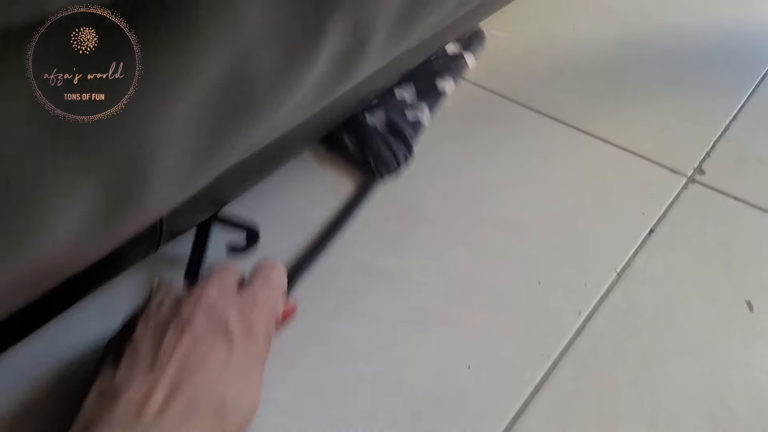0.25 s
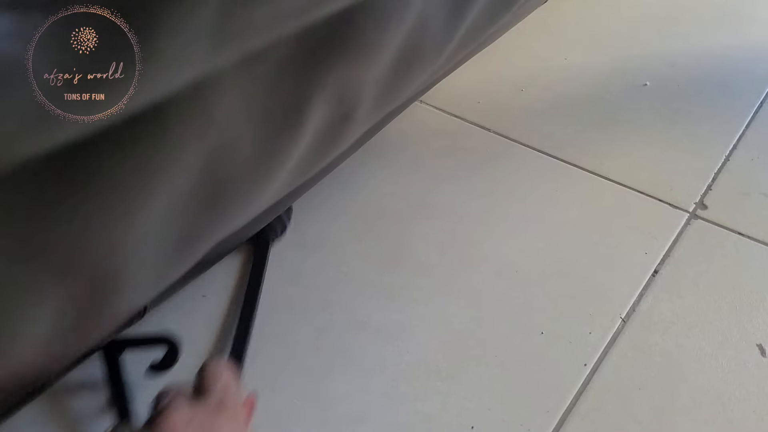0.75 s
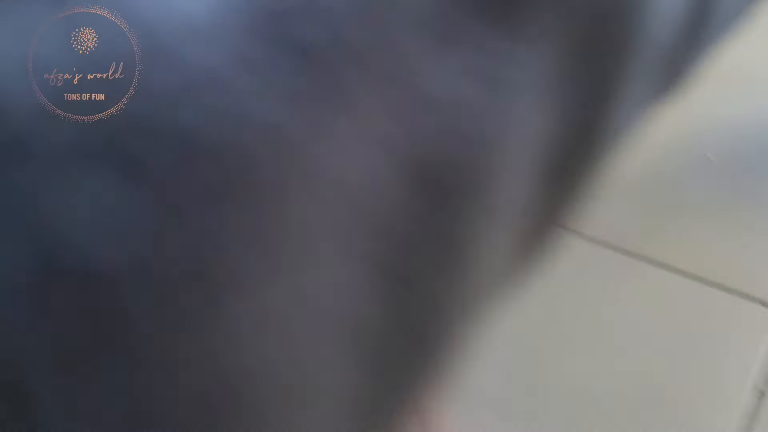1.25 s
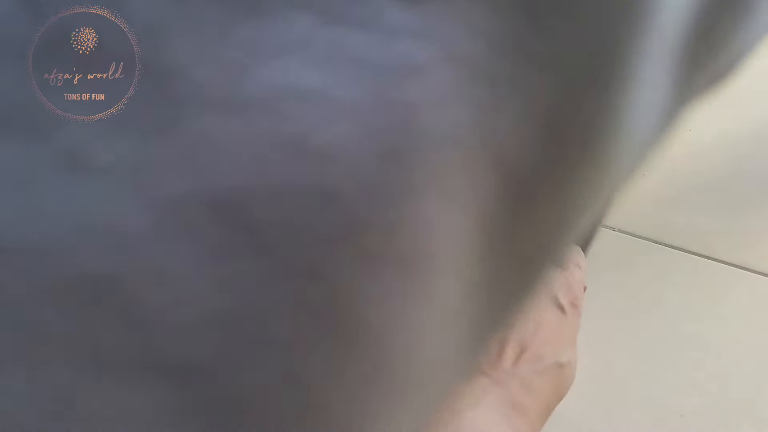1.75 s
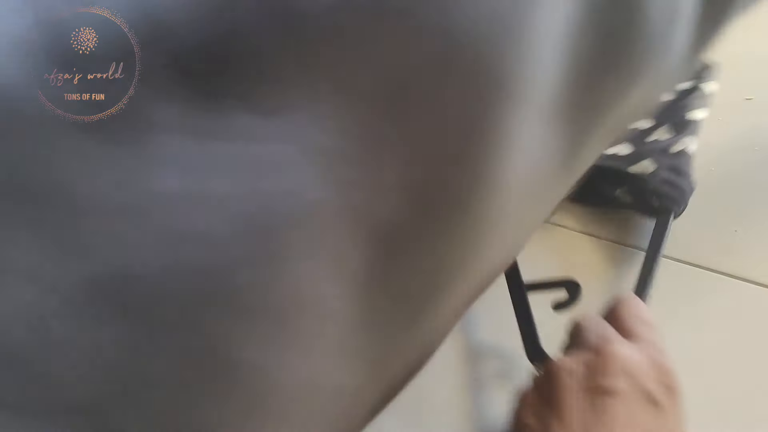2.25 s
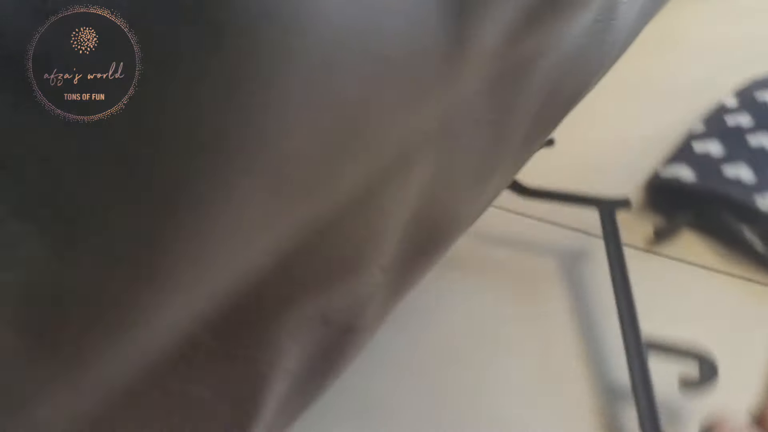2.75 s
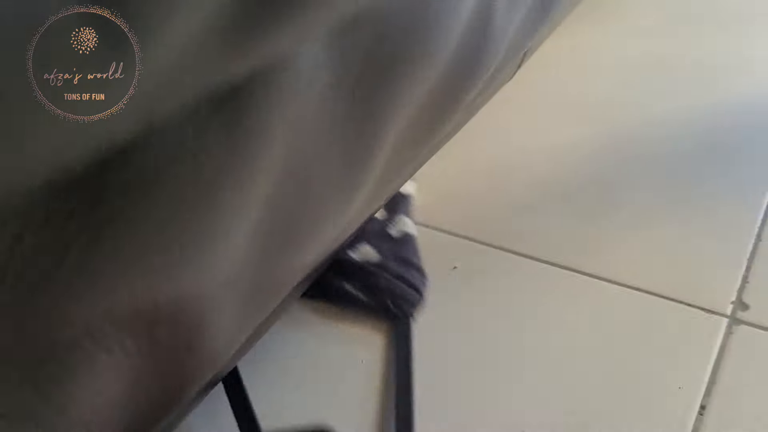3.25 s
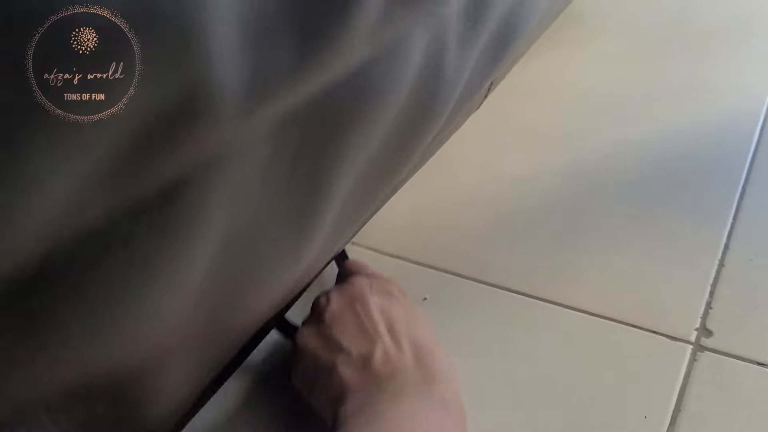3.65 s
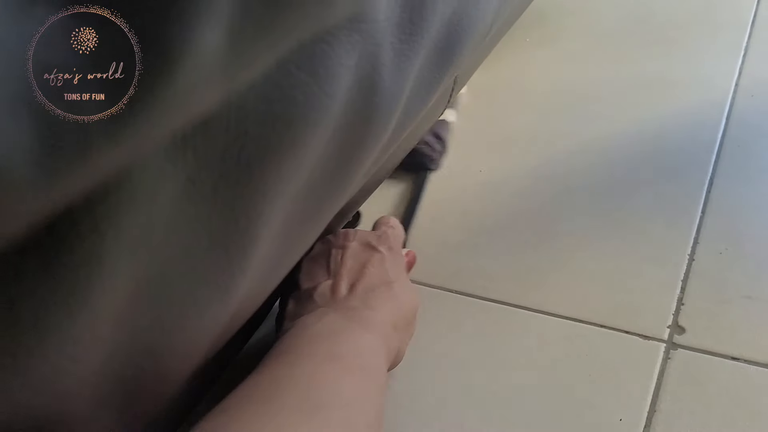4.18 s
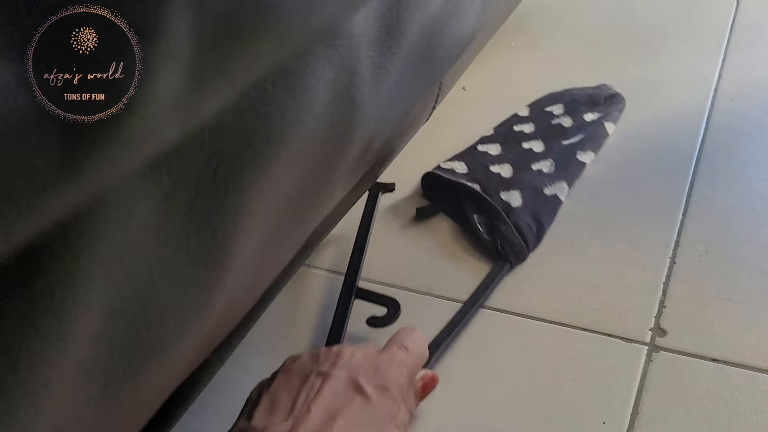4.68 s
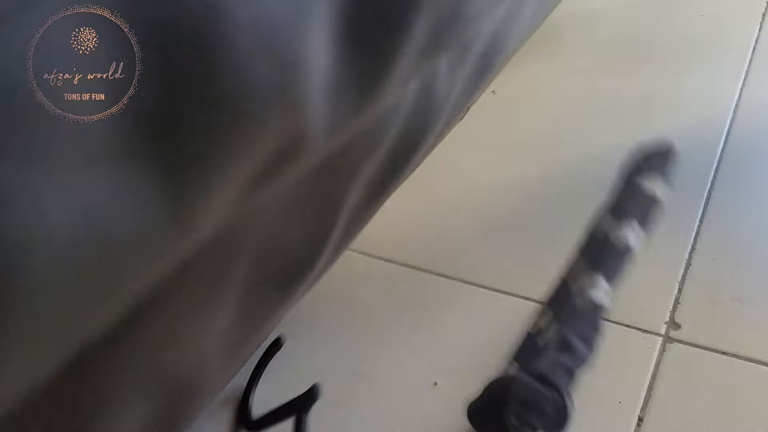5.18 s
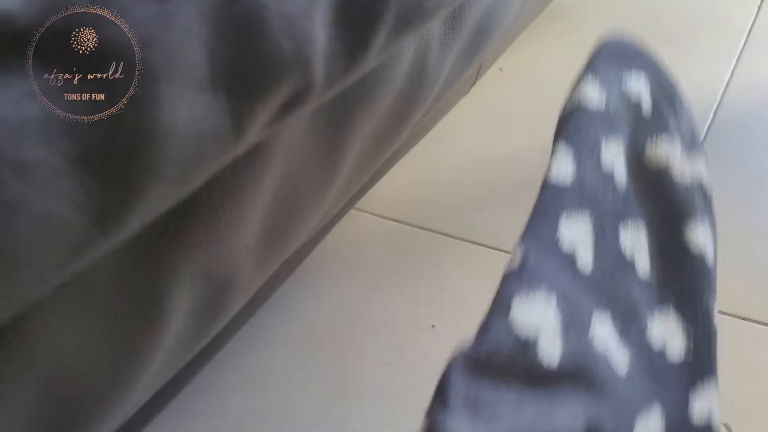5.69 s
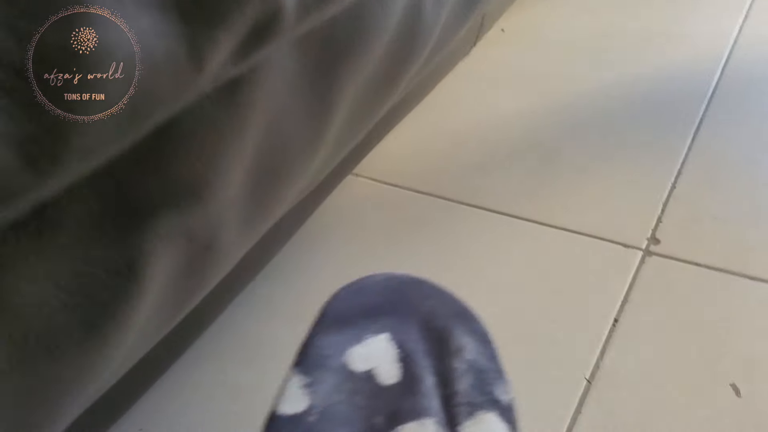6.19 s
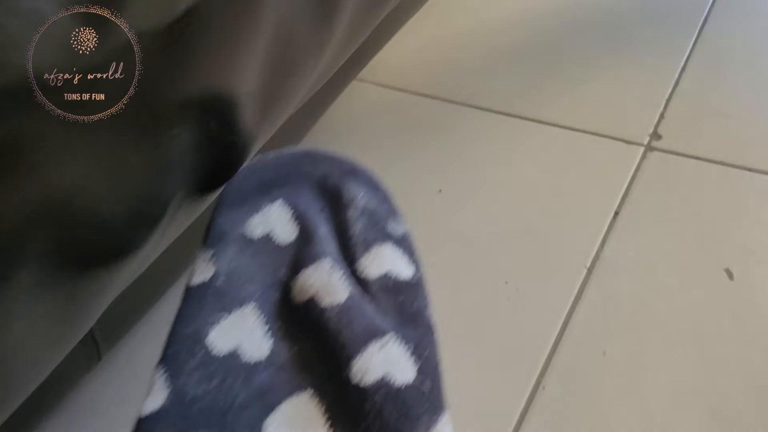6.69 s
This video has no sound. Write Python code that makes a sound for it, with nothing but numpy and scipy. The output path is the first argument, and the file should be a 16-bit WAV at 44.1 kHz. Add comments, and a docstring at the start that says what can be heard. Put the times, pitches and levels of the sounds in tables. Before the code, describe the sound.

Hollow plastic scuffs, short squeaky drags and bright clacks on tile, soft cloth hiss and dull microphone thumps over a steady low hum.

```python
"""A plastic hanger with a sock on its end is pushed about on floor tiles under a sofa, close to a hand-held phone.
The sock hisses as shaped noise; the bare plastic scrapes as noise and kicks through resonances.
It also sings in gliding narrow bands, and clacks as decaying tones with a rattle and a tiled echo.
The phone bumps the sofa at its left microphone and the grip rubs at its right one: low swings and lumps.
Behind them a fan hums in steady multiples of its blade rate, over the room's rumble, hum and faint noise."""
import sys
import numpy as np
from scipy import signal
from scipy.fft import rfft, irfft, next_fast_len
from scipy.io import wavfile
from scipy.ndimage import uniform_filter1d, map_coordinates

SR = 44100
rng = np.random.default_rng(int(sys.argv[2]) if len(sys.argv) > 2 else 0)


def generate_wav(signal):
    """Clip the signal to [-1, 1] and save it as 16-bit WAV at the path in sys.argv[1]."""
    frames = np.transpose(np.atleast_2d(signal))
    scaled = np.clip(frames, -1, 1) * 32767
    pcm = np.round(scaled).astype(np.int16)
    wavfile.write(sys.argv[1], SR, pcm)


N = 305657  # length in samples


def amp(db):
    """Gain of a level in dB."""
    return 10 ** (np.asarray(db) / 20)


def unit(x):
    """Scale x to an rms of 1."""
    return x / np.sqrt(np.mean(x ** 2) + 1e-20)


def along(points, hz):
    """Read a curve of (Hz, value) points on a log frequency axis."""
    f, value = np.transpose(points)
    return np.interp(np.log(hz + 1), np.log(f + 1), value)


def curves(rows):
    """Give one value per sample for each column after the time."""
    s, *columns = np.transpose(rows)
    return [np.interp(np.arange(N) / SR, s, column) for column in columns]


def wobble(rate, size=N):
    """Draw a smooth random curve through `rate` random points a second."""
    knots = rng.standard_normal(int(size * rate / SR) + 4)
    return map_coordinates(knots, [np.arange(size) * rate / SR])


def filtered(x, response):
    """Multiply the spectrum of x by a response, which is a function of frequency."""
    m = next_fast_len(x.shape[-1] + 8192)
    spectrum = rfft(x, m) * response(np.fft.rfftfreq(m, 1 / SR))
    return irfft(spectrum, m)[..., :x.shape[-1]]


def colour(points):
    """Make a filter response from (Hz, dB) points."""
    return lambda hz: amp(along(points, hz))


def resonant(peaks):
    """Make the response of (Hz, width Hz, dB) resonances, added with alternating sign."""
    def response(f):
        total = 0
        for k, (centre, width, db) in enumerate(peaks):
            damping = 1j * f * width
            total = total + (-1) ** k * amp(db) * damping / (centre ** 2 - f ** 2 + damping)
        return total
    return response


def pair(alike, grit_db):
    """Stereo noise with a shared part; grit makes its level waver in fine grains."""
    shared, left, right = rng.standard_normal((3, N))
    noise = np.sqrt(alike) * shared + np.sqrt(1 - alike) * np.array([left, right])
    return noise * amp(grit_db * wobble(160))


def sides(db):
    """Gains of both channels for a left-right level step."""
    return amp(np.array([db / 2, -db / 2]))


def patchy(x, depth_db):
    """Random patches of gain over time and frequency, shared by both channels."""
    z = signal.stft(x, nperseg=512)[2]
    field = rng.standard_normal(z.shape[1:])
    field = uniform_filter1d(field, size=3, axis=0)  # blur over frequency
    field = uniform_filter1d(field, size=8, axis=1)  # blur over time
    return signal.istft(z * amp(depth_db * unit(field)), nperseg=512)[1][:, :N]


def grit(rate, spread_db, alike):
    """Sparse random kicks of very unequal size, heard partly alike at both ports."""
    struck = rng.random((3, N)) < rate / SR
    size = amp(spread_db * np.minimum(rng.exponential(size=(3, N)), 3.5))
    kicks = struck * size * np.sign(rng.standard_normal((3, N)))
    return unit(np.sqrt(alike) * kicks[0] + np.sqrt(1 - alike) * kicks[1:])


def swells(peak_s, rise_s, fall_s, db):
    """Summed gain of events that swell to a peak and fade, evenly in dB: 12 dB per rise or fall time."""
    late = np.arange(0, N + 32, 32)[None] / SR - np.c_[peak_s]  # one value per 32 samples
    fall_s = np.maximum(fall_s, .015)  # no fade is quicker than this
    away = np.where(late < 0, -late / np.c_[rise_s], late / np.c_[fall_s])
    power = np.sum(amp(np.c_[db] - 12 * away) ** 2, axis=0)
    return np.repeat(np.sqrt(power), 32)[:N]


def skids(column):
    """Gain that the hanger's landing and skidding out gives to one layer: a quick swell and a fade."""
    # the skids: t/s, cloth hiss level/dB, fine fluff level/dB, long arms level/dB, short parts level/dB,
    # time to fade 12 dB/s (swells raises the shortest)
    skid_rows = np.array([(1.244, -60, -49.5, -39.5, -43.5, 0.1), (1.352, -53, -51.5, -41.5, -44, 0.24),
                          (1.658, -52, -55.5, -42, -37.5, 0.07), (1.944, -58, -61, -46, -48, 0),
                          (2.109, -44, -62, -43, -37.5, 0.0652), (2.562, -65, -52, -44.5, -50.5, 0.08),
                          (3.19, -54, -47.5, -58, -46, 0.07), (3.918, -61, -59, -47, -47, 0.06),
                          (4.208, -40.5, -40, -38.5, -44, 0.03), (4.251, -32.5, -39, -38, -34, -0.04),
                          (4.273, -36, -39.5, -37, -36, -0.0629), (5.091, -31.5, -33.5, -36.5, -25, 0.1),
                          (5.692, -49, -61, -41.5, -33, 0.07)])
    attack_s = np.full(len(skid_rows), 0.0021)  # time to swell 12 dB
    return swells(skid_rows[:, 0], attack_s, skid_rows[:, -1], skid_rows[:, column])


def cloth():
    """The knitted sock brushes tile and upholstery: a soft hiss of two noise bands."""
    # the sock sweeping: t/s, cloth hiss level/dB, fine fluff level/dB, left-right step/dB
    sweeps = [(0.0, -62, -67, -1), (0.08, -66.5, -70, -1.5), (0.17, -54.5, -61, 0), (0.28, -53, -57.5, 0.4),
              (0.5, -57, -56, 0.5), (0.89, -63, -65, -2), (1.07, -50.5, -52, -3), (1.22, -63, -60, 0),
              (1.505, -53, -53, 0.3), (1.59, -59.5, -59, 1), (1.75, -55.5, -53.5, 0),
              (1.85, -67, -65, -0.5), (1.99, -58.5, -59, 1.5), (2.1, -73, -67, -1.5),
              (2.22, -59, -59, -1.5), (2.33, -68.5, -70, -3), (2.47, -61.5, -63, 0.5),
              (2.75, -50, -48.5, 3), (3.05, -53, -52.5, 0), (3.12, -63, -60, 3), (3.72, -56, -56, -5.5),
              (3.9, -59, -52.5, 1.5), (4.09, -61, -57.5, 1), (4.19, -55, -55, -3), (4.32, -52.5, -50.5, -1),
              (4.64, -51.5, -53, 0.5), (4.93, -51.5, -54, -0.9), (5.08, -65, -54, -1),
              (5.41, -50.5, -49.5, -1), (5.51, -62.5, -58, -3), (5.685, -64, -63.5, -6),
              (5.85, -58.5, -57, -1.5), (5.99, -60, -59, 0.3), (6.1, -69, -67.5, -1), (6.19, -81, -78, -2),
              (6.35, -78, -75, -3), (6.5, -66.5, -66, -3.5), (6.93, -71, -61, -6.5)]
    # spectrum of the cloth hiss: f/Hz, level per Hz/dB
    weave_spectrum = [(1760, -39), (3000, -19), (3380, -40), (3620, -7.5), (4720, 1), (6460, 1.5),
                      (9500, 1), (12400, -6.5), (20900, -120)]
    # spectrum of the fine fluff: f/Hz, level per Hz/dB
    fluff_spectrum = [(5000, -18.5), (8500, -7), (11000, 0.5), (15100, -6.5), (15900, -5.5), (16200, -24.5)]
    weave_db, fluff_db, pan_db = curves(sweeps)
    weave = unit(filtered(patchy(pair(0.025, grit_db=1.05), depth_db=2.0), colour(weave_spectrum)))
    fluff = unit(filtered(patchy(pair(.05, grit_db=1.1), depth_db=0.5), colour(fluff_spectrum)))
    # sweeps and skids add as powers
    weave_gain = np.hypot(amp(weave_db), skids(column=1))
    fluff_gain = np.hypot(amp(fluff_db), skids(column=2))
    return amp(0.76 * wobble(22)) * (weave_gain * weave + fluff_gain * fluff) * sides(pan_db)


def scrape():
    """Grit under the sliding plastic kicks the resonances of the frame, on top of a fine rub."""
    # bare plastic scuffs the tile: loudest t/s, time to swell 12 dB/s, time to fade 12 dB/s (both have
    # a shortest value), long arms level/dB, short parts level/dB (both trimmed below)
    scuffs = [(0.06, -2, 0.3, -56.5, -64), (0.28, 0.2, 0.05, -56, -54), (0.45, 0.1, 0.1, -47, -51.5),
              (0.73, 1.2, -0.2, -60.5, -63), (1.085, 0.12, 0.2, -49, -44.5),
              (1.425, 0.13, 0.22, -50, -43.5), (1.735, 0, 0.27, -51, -60), (2.22, 0.06, 0.12, -49.5, -50),
              (2.4, 2, -2, -63, -84), (2.752, 0.16, 0.05, -46, -55), (2.88, 0.2, 0.27, -53, -53.5),
              (2.968, 0.09, -0.12, -41.5, -43), (3.052, 0.08, 0.07, -42.5, -48.5),
              (3.15, 0.06, 0.09, -42.5, -55), (3.235, -0.3, 0.15, -51, -64), (3.7, 0.37, 0.2, -72, -52),
              (3.86, 0.35, 0.5, -52, -60), (4.045, 0.08, 0.17, -46.5, -58), (4.29, 0.11, 0.03, -47, -39.5),
              (4.34, 0.06, 0.01, -48, -42.5), (4.65, 0.5, 0.1, -49.5, -54.5), (4.86, 0.1, -0.1, -63, -49),
              (5.019, 0.08, 0.04, -37, -49.5), (5.32, 0.15, 0.04, -55, -38.5),
              (5.431, 0.0337, 0.0427, -37, -32.5), (5.55, 0.5, 0.12, -56.5, -52),
              (5.9, 0.13, -0.01, -59, -47.5), (6.01, 0, -0.01, -52.5, -45), (6.45, 0.3, 1.5, -64.5, -65),
              (6.8, 1, 7, -70.5, -70)]
    # resonances of the long arms: f/Hz, width/Hz, level/dB
    arm_peaks = [(452, 82, 7), (685, 163, 5.5), (791, 159, 5), (982, 92, 0.5), (1240, 250, -5)]
    # resonances of the short parts: f/Hz, width/Hz, level/dB
    part_peaks = [(1515, 230, 3.5), (1960, 295, 5), (2250, 247, 3), (2800, 580, -1), (3540, 850, -3.5),
                  (4650, 1000, -6.5)]
    rest_db = -76  # the plastic barely touches between scuffs; before the trims

    def steep(peaks):
        """The resonances with less bass below the first and less treble above the last."""
        def response(hz):
            bass_cut = hz ** 2 / (hz ** 2 + peaks[0][0] ** 2)
            return resonant(peaks)(hz) * bass_cut / (1 + (hz / peaks[-1][0] / 2.2) ** 4)
        return response

    peak_s, rise_s, fall_s, arms_db, parts_db = np.transpose(scuffs)
    rise_s = np.maximum(rise_s, .02)  # a scuff never starts abruptly
    arms_gain = np.hypot(swells(peak_s, rise_s, fall_s, arms_db), skids(column=3)) + amp(rest_db)
    parts_gain = np.hypot(swells(peak_s, rise_s, fall_s, parts_db), skids(column=4)) + amp(rest_db)
    kicks = patchy(0.73 * grit(500, spread_db=3.5, alike=0.48), depth_db=3.5)
    arms_rub = patchy(pair(0.38, grit_db=0.0), depth_db=3.5)
    parts_rub = patchy(pair(0.061, grit_db=1.5), depth_db=2.5)
    arms = unit(filtered(arms_rub + kicks, steep(arm_peaks)))
    parts = unit(filtered(parts_rub + kicks, steep(part_peaks)))
    slip = wobble(25)  # the stroke catches and lets go
    arms_gain = arms_gain * amp(-4.0 + 0.4 * slip)
    parts_gain = parts_gain * amp(-6.5 + 1.3 * slip)
    return (arms_gain * arms + parts_gain * parts) * sides(np.array([-3.]))


def drags():
    """Slips of the plastic ring a narrow band that glides: kicks and slow noise carried on a moving pitch."""
    # one part of the frame sings while it drags: start t/s, end t/s, first f/Hz, last f/Hz, width/Hz,
    # level/dB (before the swell and fade), left-right step/dB
    glides = [(0.39, 0.503, 590, 674, 150, -49, -1), (0.4, 0.52, 1400, 1470, 200, -53.5, -2),
              (1.646, 1.678, 1820, 2300, 630, -40, -6), (1.635, 1.675, 4400, 4000, 900, -47.5, -4),
              (1.5, 1.6, 1780, 1850, 300, -58.5, -2), (1.68, 1.725, 1900, 1800, 400, -59, -5),
              (1.652, 1.675, 920, 650, 400, -42, 0), (2.19, 2.25, 4400, 4200, 900, -55.5, -3),
              (2.195, 2.232, 1926, 1600, 250, -43.5, -2.5), (2.689, 2.84, 1590, 1615, 250, -53.5, -2),
              (2.656, 2.826, 2250, 2100, 290, -57.5, -9), (1.374, 1.516, 705, 680, 460, -47.5, 12),
              (1.36, 1.46, 1900, 1700, 900, -50.5, 3), (1.38, 1.44, 4200, 2900, 1500, -54, 7),
              (3.02, 3.18, 1350, 1200, 440, -53, -3), (3.2, 3.26, 2300, 2200, 700, -54.5, -6),
              (2.69, 2.82, 670, 780, 300, -53, -3), (2.872, 2.984, 1580, 1620, 190, -57, -5),
              (3.083, 3.178, 2240, 2270, 180, -55, -12), (3.223, 3.237, 1400, 1570, 200, -47, -12),
              (4.05, 4.21, 2550, 2450, 360, -61.5, -5), (4.205, 4.25, 1700, 2300, 900, -48, -2.5),
              (4.255, 4.3, 1600, 1900, 600, -45, -2), (4.34, 4.41, 1900, 1600, 1400, -51.5, 0),
              (5.78, 6.06, 3000, 3300, 1300, -55, -6), (5.7, 5.74, 1850, 1800, 300, -50, -5),
              (5.8, 5.87, 1400, 1400, 400, -57, -5), (4.27, 4.36, 3400, 3700, 900, -49.5, 0),
              (2.915, 2.985, 3600, 4000, 1500, -56, -3), (5.7, 5.8, 2700, 2700, 700, -54.5, -3),
              (5.33, 5.49, 1900, 1800, 500, -56, 1), (4.322, 4.361, 1000, 984, 210, -41.5, -1),
              (4.84, 5.04, 580, 770, 380, -48.5, -3), (5.12, 5.26, 1300, 1600, 120, -46, -7),
              (5.125, 5.25, 4500, 3800, 250, -52, -3), (5.125, 5.2, 5400, 6200, 300, -50, -3),
              (5.13, 5.3, 1880, 1700, 150, -48, 6), (5.2, 5.3, 1480, 1300, 150, -47.5, 4),
              (5.3, 5.37, 1750, 1800, 200, -49.5, 3), (5.28, 5.46, 1230, 1170, 130, -42, 9),
              (5.27, 5.44, 2540, 2620, 240, -43, -5), (5.32, 5.508, 920, 750, 590, -45.5, 0),
              (5.3, 5.36, 5200, 4200, 700, -50.5, -0.5), (5.38, 5.47, 3900, 3500, 1200, -52, -2),
              (5.37, 5.49, 2780, 2950, 180, -46, -9), (5.36, 5.485, 4520, 4480, 250, -48, 3),
              (5.76, 5.96, 2850, 2700, 600, -56, -10), (5.95, 6.17, 3200, 3000, 500, -57.5, -6),
              (5.81, 6.05, 2100, 2500, 960, -55, -10), (5.86, 6.05, 4290, 4300, 280, -58, -1),
              (5.89, 6.12, 5100, 4800, 300, -61.5, -4), (5.96, 6.04, 2550, 2550, 255, -56, -7),
              (5.99, 6.19, 2050, 1800, 350, -62.5, -9)]
    wander = .012  # a drag strays from its glide by this share of the pitch
    slips_per_s, slip_share = 1100, 0.6  # stick-slip kicks, their share against the even rub
    lean, edge = 0.72, 0.83  # a drag swells faster than it fades; softness of its ends
    sing = 0.55  # steady tone in the narrowest drags, against their noise
    out = np.zeros((2, N))
    for start, end, first_hz, last_hz, width_hz, db, pan_db in glides:
        n = round((end - start) * SR)
        rub = unit(rng.standard_normal((2, 2, SR // 2)))  # (cosine or sine part, channel, time)
        slips = (rng.random(SR // 2) < slips_per_s / SR) * rng.exponential(size=SR // 2)
        slips = unit(slips) * rng.normal(0, 1, (2, 2, SR // 2))
        lowpass = lambda hz: (1 + 2j * hz / width_hz) ** -1.4
        slow = unit(filtered(rub + slip_share * slips, lowpass)[..., -n:])
        pitch_hz = np.linspace(first_hz, last_hz, n) * (1 + wander * wobble(30, size=n))
        turn = 2 * np.pi * np.cumsum(pitch_hz) / SR
        judder = amp(1.3 * wobble(120, size=n) + 1.0 * wobble(35, size=n))  # the drag is uneven
        tone = sing * (width_hz < 260)
        band = unit(judder * ((slow[0] + tone) * np.cos(turn) + slow[1] * np.sin(turn)))
        shape = np.abs(np.sin(np.pi * np.linspace(0, 1, n) ** lean)) ** edge
        out[:, round(start * SR):][:, :n] += amp(db) * band * shape * sides(np.array([pan_db]))
    return out


def clacks():
    """Each knock rings the modes near the struck spot and rattles; the tiled room answers each in its own way."""
    # clacks: t/s, knock level/dB, where it rings most f/Hz, rattle level/dB, time for the rattle to
    # fall 60 dB/s, left-right step/dB (knock and rattle levels are trimmed below)
    knocks = [(0.733, -62, 4000, -37, 0.018, 10), (1.105, -32, 1800, -44, .02, -18),
              (1.128, -35, 1800, -52, .02, -21), (1.517, -32, 1700, -52, .01, -3),
              (1.6585, -22, 2120, -39, .02, -3), (1.662, -29, 2200, -45, .015, -3),
              (1.665, -32, 4300, -55, 0.022, -8), (1.665, -26.5, 1000, -50, .01, -3),
              (1.669, -29, 2400, -50, .01, -3), (1.9428, -28, 1100, -36, 0.007, 14),
              (2.083, -39, 1500, -64, .01, -7), (2.1067, -24.5, 1690, -21, 0.024, -6),
              (2.1075, -27, 4900, -40, .02, -6), (2.156, -34, 1600, -55, .01, -4),
              (2.178, -32, 1700, -55, .01, -4), (2.2006, -35, 1900, -50, .01, -4),
              (2.5335, -40, 2300, -48, .01, -5), (2.689, -30.5, 1300, -50, .01, -6),
              (2.7252, -38, 2300, -52, .01, -4), (2.7462, -29, 800, -52, .01, -4),
              (2.766, -34, 750, -55, .01, -2), (2.796, -31, 1600, -52, .01, -4),
              (2.8878, -44, 1600, -55.5, .01, -4), (2.9063, -33, 800, -52, .01, -5),
              (2.935, -40, 2300, -46, .015, -3), (2.949, -42, 1600, -46, .015, -3),
              (2.9622, -25, 750, -44, 0.026, -7), (2.971, -32.5, 1700, -48, .015, -5),
              (2.984, -36, 920, -58, .01, -3), (3.021, -30, 1000, -47, .01, -1),
              (3.053, -33, 800, -50, .01, 1), (3.066, -33, 720, -55, .01, 2),
              (3.085, -36, 750, -55, .01, 0), (3.1532, -33.5, 800, -49, .01, -2),
              (3.165, -42, 1300, -52, .01, -2), (3.1885, -16, 2060, -37, .015, -9),
              (3.212, -35, 2300, -50, .01, -6), (3.235, -39, 900, -52, .01, -6),
              (3.916, -24.5, 1630, -40, 0.013, -9), (4.0274, -30, 900, -54.5, .01, -7),
              (4.042, -35, 1200, -56, .01, -5), (4.061, -39, 900, -55, .01, -3),
              (4.201, -50, 4800, -33.5, .03, -1), (4.208, -29, 1490, -50, .01, -5),
              (4.214, -44, 4800, -25, 0.029, -5), (4.2505, -11.5, 1500, -34, .03, -5.5),
              (4.258, -22.5, 1900, -38, .02, -3), (4.2714, -20, 3200, -25, 0.035, 1),
              (4.2215, -37, 1200, -36, .015, -3), (4.238, -35, 1400, -50, .01, 6),
              (4.265, -35, 1600, -45.5, .015, -2.5), (4.279, -29, 1200, -39.5, .015, 0),
              (4.291, -34, 2200, -41, .02, -2), (4.3, -33, 3200, -44, .01, 0),
              (4.3312, -30, 900, -50, .01, 2), (4.342, -33, 1300, -46, .01, 0),
              (4.352, -30, 900, -52, .01, 0), (4.366, -36, 800, -54, .01, 0),
              (4.394, -37, 1500, -54, .01, 0), (4.3746, -36, 1300, -52, .01, 0),
              (5.0902, -13.5, 1500, 4.5, 0.02, -3), (5.0923, -19.5, 2600, -0.5, 0.013, -4),
              (5.114, -20, 4700, 5.5, 0.012, -1.5), (5.1155, -13.5, 1450, -4, 0.02, -1),
              (5.129, -30, 1500, -16, .01, -2), (5.2907, -30, 2400, -46, .015, 0),
              (5.322, -27.5, 2500, -41.5, .02, 0), (5.392, -28, 2600, -40, .02, -2),
              (5.412, -29, 2700, -42, .02, -2.5), (5.692, -11, 3900, -22, 0.015, -12)]
    # ringing modes of the plastic: f/Hz, level/dB, time to fall 60 dB/s
    modes = [(680, 1, 0.026), (900, 1.5, 0.017), (1230, 1.5, 0.0071), (1445, -4.5, 0.025), (1674, 0, 0.016),
             (2370, 1, 0.0079), (2910, -1.5, 0.0057), (3390, -4.5, 0.017), (4840, -1.5, 0.013),
             (5470, -0.5, 0.013)]
    # spectrum of the bright rattle: f/Hz, level per Hz/dB
    rattle_spectrum = [(1760, -39.5), (3000, -11), (4100, -14.5), (4900, -5.5), (5370, -11), (7350, -4.5),
                       (8960, -6), (12300, 2.5), (14300, -9), (15700, -6.5), (16400, -24)]
    # echo of the tiled room: f/Hz, time to fall 60 dB/s
    echo_times = [(800, 0.78), (3000, 0.49), (8000, 0.16), (15000, 0.36)]
    crack_db, crack_s = -15, 0.0016  # first contact against the untrimmed knock level; time to fall 60 dB
    out, t = np.zeros((2, N + SR)), np.arange(SR // 2) / SR
    for s, knock_db, spot_hz, rattle_db, t60, pan_db in knocks:
        luck_db = rng.normal(0, 2.2, (len(modes), 2, 1))
        # each mode reaches each port by its own path
        shift = rng.normal(0, .4, (len(modes), 2, 1)) + rng.normal(0, .8, (len(modes), 1, 1))
        ring = 0
        for (hz, level_db, life_s), more_db, turn in zip(modes, luck_db, shift):
            off_spot_db = 20 * np.log2(hz / spot_hz) ** 2  # weaker an octave away from the spot
            fading = amp(level_db + more_db - off_spot_db - 60 * t / life_s)
            ring = ring + fading * np.sin(2 * np.pi * hz * t + turn)
        rattle = unit(filtered(rng.standard_normal((2, len(t))), colour(rattle_spectrum)))
        rattle = rattle * amp(-60 * t / t60)
        dull = lambda f: 1 / (1 + (f / 5500) ** 2)
        crack = filtered(rng.standard_normal(len(t)), dull)
        hit = amp(knock_db - 10.5) * ring * (1 - np.exp(-t / 0.0002))
        hit += amp(rattle_db - 6.5) * rattle * (1 - np.exp(-t / 0.00073))
        hit += amp(knock_db + crack_db - 60 * t / crack_s) * crack
        # the echo is noise that dies at its own pace in each band
        hz, u, z = signal.stft(rng.standard_normal((2, len(t))), SR, nperseg=256)
        tail = signal.istft(z * amp(-60 * u / along(echo_times, hz)[:, None]), SR, nperseg=256)[1]
        echo = signal.fftconvolve(hit, tail / np.linalg.norm(tail[0]), axes=1)[:, :len(t)]
        out[:, round(s * SR):][:, :len(t)] += hit * sides(np.array([pan_db])) + amp(-8.0) * echo
    return out[:, :N]


def bumps():
    """Contacts with the phone itself swing the diaphragms inward first, then let them ring down."""
    # soft thuds on the phone: t/s, left level/dB, right level/dB, f/Hz, time to fall 60 dB/s
    thuds = [(1.246, 18, -6, 266, 0.015), (1.2521, 0.5, -31, 118, 0.039), (2.564, 2, -19, 247, 0.0098),
             (2.569, -19.5, -44, 70.6, 0.1), (0.2316, -27, -27, 255, 0.075), (0.2482, -19, -18, 122, 0.044),
             (0.2905, -26, -25, 100, .05), (0.2617, -22, -20, 243, 0.063), (0.2742, -22, -26, 205, 0.031),
             (0.292, -21, -20.5, 227, 0.083), (4.3093, -12.5, -11.5, 220, 0.03),
             (4.332, -17, -18, 210, 0.037), (4.3439, -11.5, -13, 130, 0.023),
             (4.1191, -45, -27, 190, 0.028), (4.1241, -55, -9.5, 127, 0.032),
             (4.161, -48, -16.5, 96, 0.063), (4.174, -44, -15.5, 55.83, 0.091),
             (4.236, -30, -25, 64.8, 0.055), (4.36, -33, -11.5, 57.5, 0.08), (5.113, -28, -25, 268, 0.046),
             (5.168, -29, -25.5, 70, .08), (5.358, -27, -23, 100, 0.073), (5.398, -26, -26, 90, .06),
             (5.452, -29, -30, 62, .1)]
    # sharp taps at the left port: t/s, spike level/dB, rebound level/dB, rebound f/Hz, time to fall 60 dB/s
    taps = [(1.259, -1, 4, 43.7, 0.036), (1.3510, -4, -6, 296, 0.022)]
    out, t = np.zeros((2, N + SR)), np.arange(SR // 4) / SR
    lag = round(0.00065 * SR)  # the shock runs along the case to the right port
    for s, left_db, right_db, hz, t60 in thuds:
        swing = -np.sin(2 * np.pi * hz * t) * amp(-60 * t / t60) * (1 - np.exp(-t / 0.00077))
        out[0, round(s * SR):][:len(t)] += amp(left_db) * swing
        out[1, round(s * SR) + lag:][:len(t)] += amp(right_db) * swing
    width_s = 0.000077  # from the start of a tap to the top of its spike
    for s, spike_db, rebound_db, hz, t60 in taps:
        spike = -amp(spike_db) * np.e * t / width_s * np.exp(-t / width_s)
        rebound = amp(rebound_db - 60 * t / t60) * np.sin(2 * np.pi * hz * t + 0.67)
        rebound = rebound * (1 - np.exp(-t / 0.0012))
        out[0, round(s * SR):][:len(t)] += spike + rebound
        out[1, round(s * SR) + lag:][:len(t)] -= amp(-26) * rebound  # faint and upside down
    return out[:, :N]


def grip():
    """Skin slides over the right port in low lumps; the left one hears little."""
    # a finger shifts at the right port: t/s, level/dB (raised a little below)
    shifts = [(3.95, -61.5), (4.05, -37), (4.12, -47), (4.216, -39), (4.244, -25.5), (4.276, -28.5),
              (4.478, -37), (4.51, -45), (4.65, -60.5)]
    s, db = np.transpose(shifts)
    level_db = np.interp(np.arange(N) / SR, s, db, left=-120, right=-120)
    lumps = resonant([(50.3, 45.4, 0), (108.6, 128, -5.0), (302, 116, -9)])
    rub = unit(filtered(pair(0.34, grit_db=2.5), lumps))
    return amp(level_db + 2.5 + 1.6 * wobble(30)) * rub * amp([[-10], [0]])


def fan():
    """Tones at multiples of a fan's blade rate waver together in pitch and one by one in level."""
    # blade tones: multiple of the blade rate, level/dB (before it wavers)
    blade_tones = [(3, -58.5), (4, -49.5), (5, -57.5), (6, -63.5)]
    blade_hz = 72.94  # middle of the wavering blade rate
    turn = 2 * np.pi * np.cumsum(blade_hz * (1 + 0.00793 * wobble(6))) / SR
    tones = 0
    for k, db in blade_tones:
        wave = np.sqrt(2) * np.sin(k * turn + 2 * np.pi * rng.random())
        tones = tones + amp(db + 2.7 * wobble(14)) * wave
    return tones * sides(np.array([-1.6]))


def room():
    """Rumble and hum are filtered noise, nearly alike at both ports; the faint far tone is not."""
    # the room over time: t/s, deep rumble level/dB, hum level/dB (both before the random swell)
    room_levels = [(0.0, -48, -33.5), (0.2, -43, -44), (0.27, -35.5, -38), (0.39, -45, -41.5),
                   (0.75, -47.5, -39.5), (0.92, -48.5, -45.5), (1.09, -41.5, -38.5), (1.5, -53.5, -41),
                   (1.94, -43.5, -42.5), (2.5, -54, -43), (3.0, -44.5, -40), (3.65, -53.5, -44.5),
                   (4.32, -40.5, -40), (4.66, -51.5, -45), (4.95, -47.5, -39.5), (5.06, -52.5, -40.5),
                   (5.15, -43.5, -42), (5.29, -47, -43.5), (5.385, -39, -37), (5.49, -41.5, -39.5),
                   (5.66, -47.5, -41), (5.8, -42.5, -41), (6.25, -46.5, -42), (6.93, -45.5, -44)]
    # spectrum of the rumble: f/Hz, level per Hz/dB
    rumble_spectrum = [(13, -40), (22, -4.5), (59, 8.5), (97, -2.5), (140, 4), (176, -9.5), (220, -16),
                       (290, -34.5), (480, -120)]
    # resonances of the hum: f/Hz, width/Hz, level/dB
    hum_peaks = [(236.7, 99.4, -7), (268, 23.8, -2), (293.6, 35.5, -5), (328.6, 36.5, -3), (362, 51, -10),
                 (492, 61, -18), (513.5, 64, -18)]
    # spectrum of the far room tone: f/Hz, level per Hz/dB
    still_spectrum = [(300, -27.5), (450, 5), (650, -12.5), (1000, -10), (1300, -32.5), (1750, -18.5),
                      (2050, -14), (2600, -29), (4000, -29.5), (7000, -43.5), (11000, -37), (16000, -41)]
    surge_db = 1.95  # rumble and hum swell and sink at random, a few times a second
    rumble_db, hum_db = curves(room_levels)
    rumble = unit(filtered(pair(0.95, grit_db=0), colour(rumble_spectrum))) * sides(np.array([-4.5]))
    steep = lambda hz: resonant(hum_peaks)(hz) / (1 + (hz / 520) ** 4)  # little hum reaches the middle
    hum = unit(filtered(pair(0.9, grit_db=2), steep)) * sides(np.array([-1.6]))
    tone = unit(filtered(pair(0.082, grit_db=-0.5), colour(still_spectrum))) * sides(np.array([-4.]))
    rumble_gain = amp(rumble_db + surge_db * wobble(7.9) + 2.4 * wobble(9.4))
    hum_gain = amp(hum_db + 0.57 * surge_db * wobble(6) + 0.9 * wobble(12))
    return rumble_gain * rumble + hum_gain * hum + amp(-60) * tone


def scene():
    """All sources at the two ports."""
    return cloth() + scrape() + drags() + clacks() + bumps() + grip() + fan() + room()


def record(dry):
    """The microphones lose the deepest bass, the converter clips at full scale, a sharp cut ends the treble."""
    low_hz, top_hz = 40, 16300

    def bass_loss(hz):
        """Second-order high-pass."""
        x = hz / low_hz
        return (1j * x) ** 2 / (1 + np.sqrt(2) * 1j * x - x ** 2)

    thin = filtered(dry, bass_loss)
    return filtered(np.clip(thin, -1, 1), lambda hz: hz < top_hz)


dry = scene()
out = record(dry)
generate_wav(out)
```